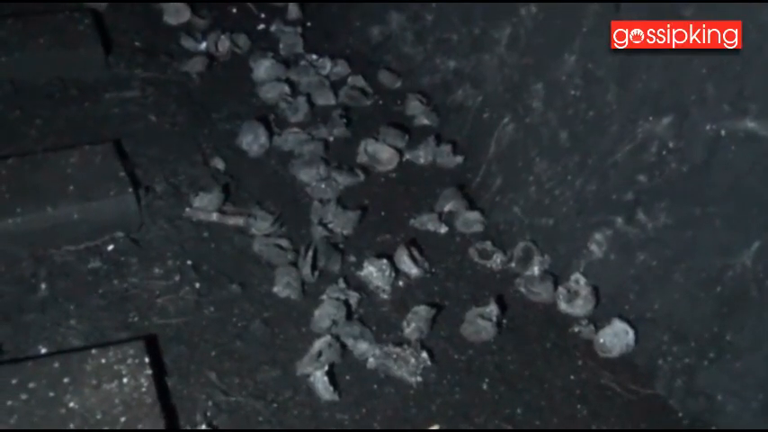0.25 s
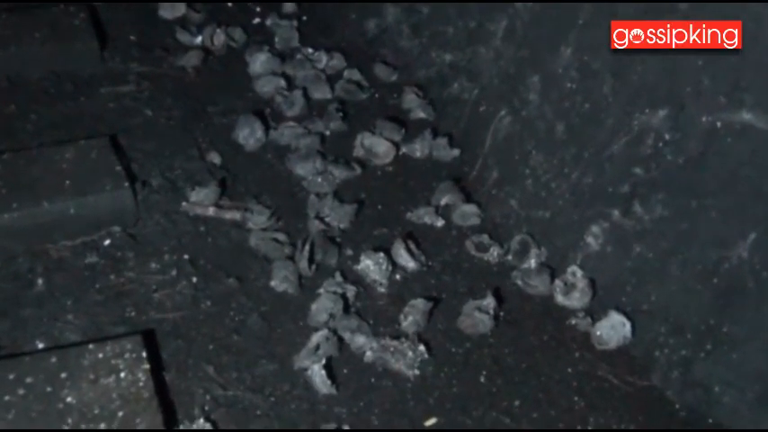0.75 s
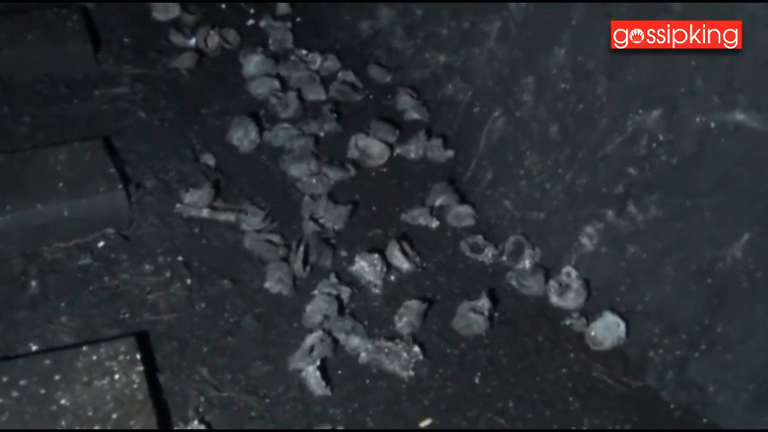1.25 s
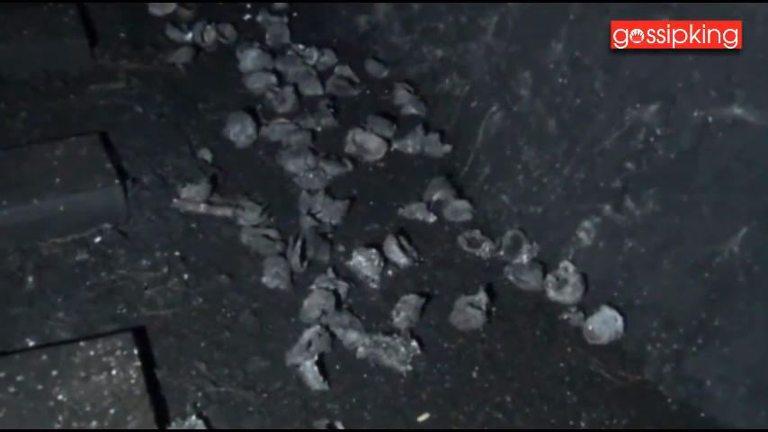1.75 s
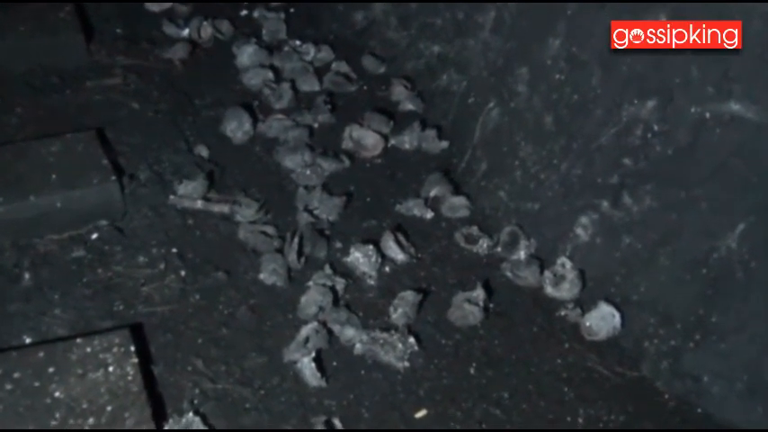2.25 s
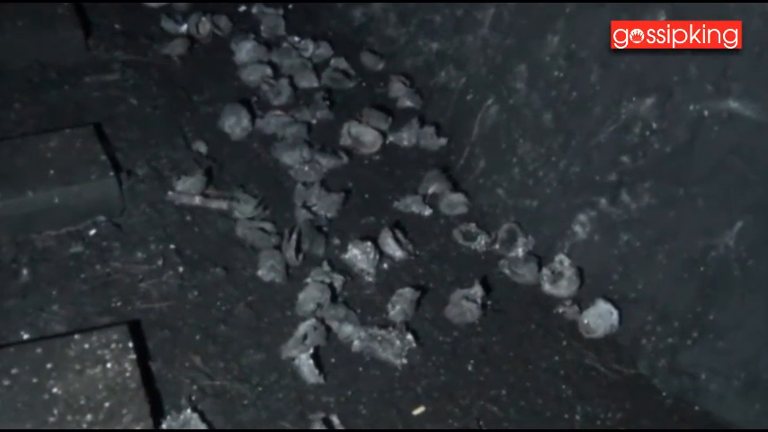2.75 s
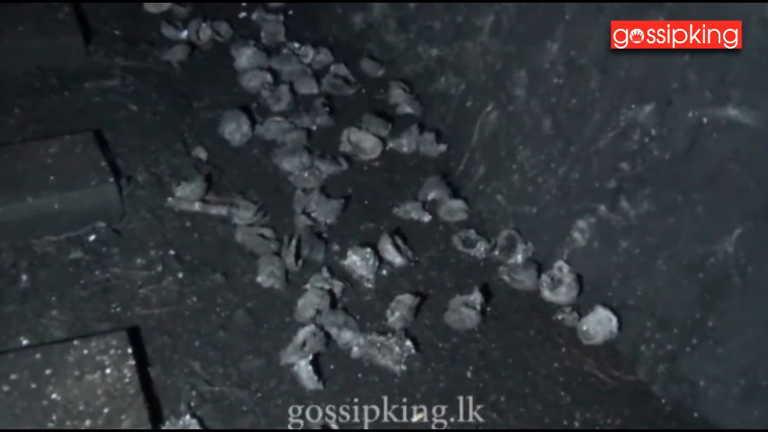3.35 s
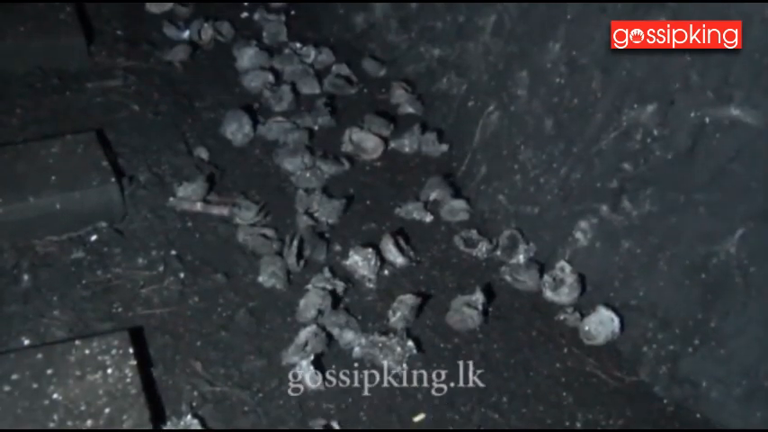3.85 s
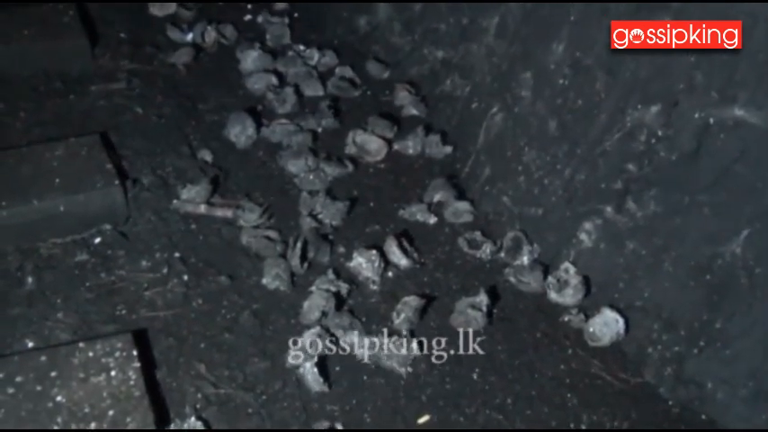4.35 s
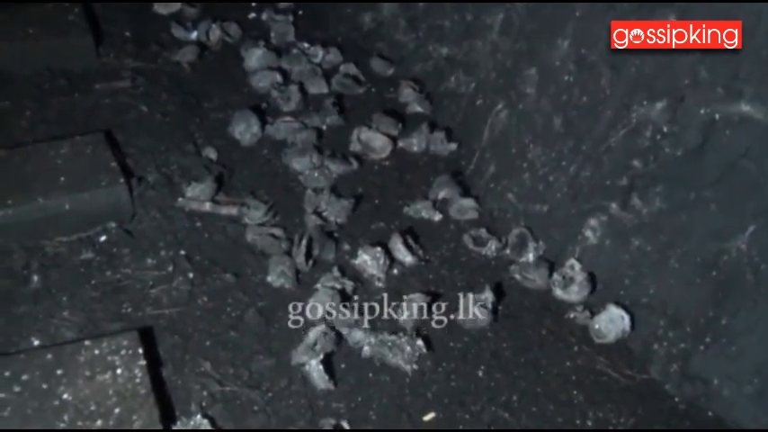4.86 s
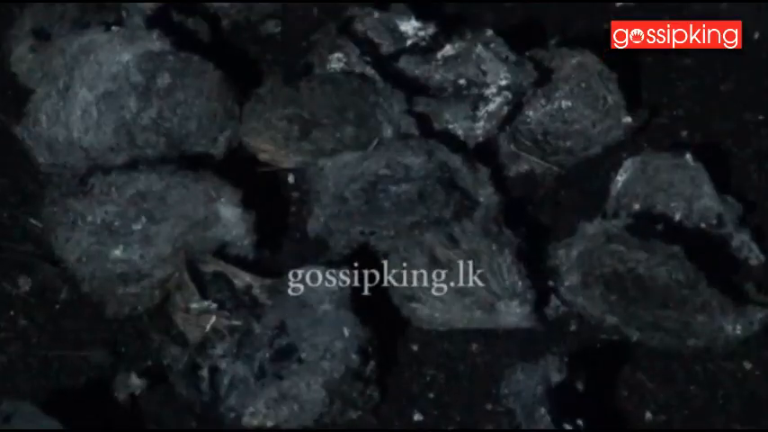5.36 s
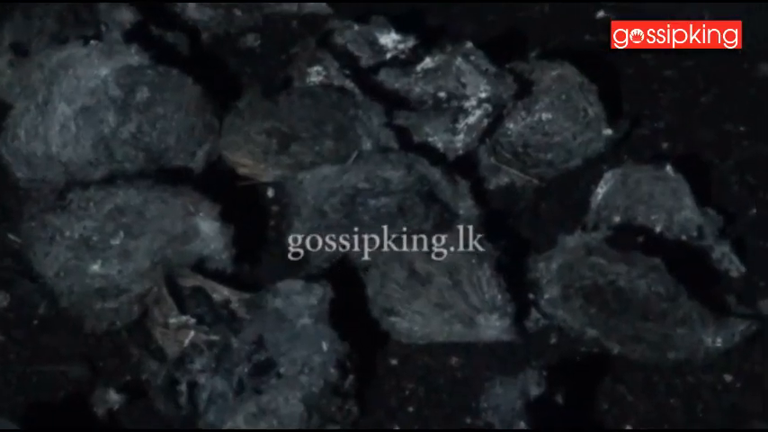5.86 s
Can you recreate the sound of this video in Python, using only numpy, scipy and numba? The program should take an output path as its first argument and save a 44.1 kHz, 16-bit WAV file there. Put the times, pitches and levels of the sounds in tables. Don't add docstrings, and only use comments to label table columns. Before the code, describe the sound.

Steady high insect chirring, dry ticks and hollow shell clacks near a handheld microphone, with five-a-second rough chirps later replaced by thin high zips.

```python
import sys
import numpy as np
from scipy import signal
from scipy.io import wavfile
from scipy.ndimage import uniform_filter1d
from numba import njit

SR = 44100
rng = np.random.default_rng(int(sys.argv[2]) if len(sys.argv) > 2 else 0)


def persist_wave(psi):
    counts = np.round(np.clip(psi, -1, 1) * 32767).astype(np.int16)
    wavfile.write(sys.argv[1], SR, np.atleast_2d(counts).T)


def nominal_scale(level):
    x = np.asarray(level, float) / 20
    return 10 ** x


N = 268789
T = np.arange(N) / SR

# time in seconds, level in dB.
CHORUS_LEVEL = [(0, -47.5), (.2, -49.5), (.29, -46.5), (.39, -51.5), (.45, -46), (.78, -50), (1.03, -45),
                (1.15, -52.5), (1.21, -46.5), (1.36, -47.5), (1.64, -46.5), (1.73, -53.5), (1.77, -43.5),
                (1.87, -52), (1.92, -48), (4.9, -47), (5.0, -49), (6.09, -48)]
# centre in Hz, width in Hz, level in dB,
# opposed left-right part in dB, share of the chorus swells it follows (0-1).
WING_RESONANCES = [(3525, 2400, 1.1, -12.5, 0.43), (4840, 3330, 2.34, -12.5, 1),
                   (6170, 1850, -0.42, -3.5, 0.84), (8540, 4700, -11.5, 0.5, 0)]
# start in seconds, rise in dB, fade time in seconds.
NEAR_RASPS = [(.405, 0, 0.081), (.613, 1, 0.032), (.968, 1.5, 0.084), (1.19, 3, 0.035), (1.404, 11, 0.015),
              (1.544, 9, 0.02), (1.615, 7.5, 0.023), (1.747, 0.5, 0.048), (1.885, 10.5, 0.02),
              (1.974, 3, 0.076), (2.05, 1.5, 0.034), (2.151, 6, 0.0071), (2.19, 4, 0.023), (2.469, 7, 0.04),
              (2.642, 3, 0.032), (2.842, 7, 0.0071), (2.875, 6.5, 0.012), (3.464, 6, 0.015),
              (5.733, 9.5, 0.013)]
CHORUS_MEAN_DB = -49
LEFT_DB = 4.5

# frequency in Hz, density in dB per Hz.
AIR_SPECTRUM = [(30, 0.5), (117, 1), (327, -2.5), (665, -8.5), (817, 0), (1120, -10), (1280, -6.5),
                (2600, -11)]
# time in seconds, level in dB.
AIR_LEVEL = [(0, -51), (1.3, -54), (1.97, -52.5), (2.4, -55.5), (3.81, -52), (4.29, -55.5), (4.87, -50),
             (5.09, -51), (6.09, -49)]
# frequency in Hz, left minus right in dB.
AIR_PAN = [(60, -4), (110, 2.5), (190, 0.5), (350, 5.5), (620, 1), (1120, -0.5), (2010, 1), (3610, 10)]

# start in seconds, peak in dB, frequency in Hz, left minus right in dB.
TICKS = [
    (0.158, -36.5, 9160, 13),
    (0.5087, -29, 8300, 1),
    (0.6125, -34, 5370, -4),
    (1.279, -26, 5700, -1),
    (1.4002, -29.5, 5370, 6),
    (1.5489, -40, 6500, -3),
    (2.4818, -31, 5000, -4),
    (2.5918, -39, 3600, -6),
    (4.0054, -36, 5980, 20),
    (4.6604, -36.5, 3300, 8),
]
# start in seconds, length in seconds, resonance in Hz, width in Hz,
# level in dB.
CRICKET_SWELLS = [
    (0.201, 0.17, 6580, 900, -47),
    (.41, 0.19, 7300, 590, -55),
    (1.173, .12, 7100, 900, -46),
    (2.502, .1, 6800, 500, -50),
    (2.83, .08, 6600, 597, -50),
]
# start in seconds, length in seconds, body resonance in Hz, level in dB.
SCUFFS = [(0.262, 0.054, 330, -47.5), (0.997, 0.078, 1200, -42.5), (1.252, 0.043, 995, -52),
          (1.91, 0.068, 262, -47.5), (2.36, 0.17, 1040, -49), (2.601, 0.027, 1130, -39.5),
          (3.926, 0.013, 246, -45), (4.007, 0.023, 422, -42), (4.668, 0.1, 920, -42.5),
          (4.714, 0.035, 199, -42), (4.792, 0.13, 55.4, -47.5), (4.852, .025, 650, -40),
          (5.49, 0.04, 1020, -41), (5.544, 0.01, 260, -37.5), (5.561, 0.051, 1270, -46),
          (5.66, 0.015, 200, -45.5), (5.699, 0.011, 450, -30.5), (6.015, 0.088, 200, -46.5),
          (6.018, 0.098, 640, -52)]

# start in seconds, peak in dB, ring in Hz, upper ring in dB re peak,
# left minus right in dB.
KNOCKS = [(.652, -30.5, 796, 4.5, 6), (1.102, -29, 797, 2.2, 2.5), (1.245, -14, 923, -10.5, -3.5),
          (2.483, -21, 1260, -10, -3), (2.569, -15, 897, -31, -4), (2.591, -25.5, 1144, 2, 6),
          (4.66, -29, 1210, 6, 5), (4.7161, -14, 1067, -2, 4), (4.863, -24.5, 973, -3, -8),
          (5.546, -13.5, 1020, 7, 5), (5.702, -24, 1050, 2, 3.5)]
# start in seconds, peak in dB, ring in Hz.
TAPS = [(.851, -41, 910), (.975, -35, 960), (1.009, -36.5, 1260), (1.135, -37, 1220), (1.279, -31.5, 1190),
        (2.381, -34, 1200), (2.474, -32.5, 950), (2.604, -45, 900), (3.829, -31, 1260), (3.894, -36, 970),
        (3.916, -36, 860), (4.008, -33, 1030), (4.019, -37, 1100), (4.099, -35, 920), (5.574, -35, 980)]
TAP_UPPER_DB, TAP_PAN_DB = 0, 5.5
RING_CYCLES = 20
SHELL_LOW_HZ = 373
CRACK_DB, CRACK_SHARE = -10, 0.7

# start in seconds, length in seconds, top pitch in Hz, level in dB.
NOTES = [(2.208, 0.16, 2250, -51), (2.376, 0.22, 2328, -46), (2.612, .114, 2310, -43.5),
         (2.781, .16, 2225, -46), (2.973, .17, 2340, -43), (3.173, .14, 2288, -42),
         (3.352, 0.19, 2493, -41.5), (3.555, .15, 2288, -42), (3.757, .13, 2636, -39),
         (3.944, .17, 2264, -43), (4.136, 0.17, 2297, -42), (4.326, 0.17, 2748, -39),
         (4.522, 0.16, 2625, -39), (4.727, .16, 2400, -40), (4.932, 0.066, 2430, -43)]
PARTIALS_DB = [-6.5, 0.5, -10, -18, -25.5]
NOTE_START_HZ = 2090
CLIMB_S, CLIMB_HZ_PER_S = .03, 40000

# start in seconds, peak in dB, wing resonance in Hz.
ZIPS = [
    (5.0014, -40.5, 9450),
    (5.154, -36.5, 9950),
    (5.2653, -41, 10150),
    (5.3523, -37.5, 10560),
    (5.497, -38, 9600),
    (5.625, -34, 9500),
    (5.7329, -39, 9380),
    (5.856, -36.5, 9500),
]

# frequency in Hz, share dropped (0-1).
DROPPED = [(700, .02), (1550, .2), (2200, .1), (2800, .02), (7000, .03), (8300, .2), (11100, .5),
           (11350, 1)]
# start in seconds, length in seconds.
MONO = [(-.1, .26), (.22, .104), (.434, .175), (.639, .03), (.988, .154), (1.292, .15), (1.502, .064),
        (2.015, .15), (2.434, .155), (2.953, .065), (3.118, .07), (3.238, .035), (3.457, .03),
        (3.717, .069), (3.881, .06), (4.22, .16), (4.445, .194), (4.824, .17), (5.428, .149), (5.677, .025),
        (5.897, .154)]
BASS_HZ, BASS_MARGIN_S = 1400, .074
# time in seconds, half width in seconds, dip in dB.
SPLICES = [
    (4.97, 0.011, 20.5),
    (6.005, 0.013, 9),
]


def unit(x):
    return x / np.sqrt(np.mean(x ** 2))


def noise():
    return rng.standard_normal(N)


@njit
def svf(x, hz, width):
    y, b, l = np.empty(len(x)), 0., 0.
    g, k = np.tan(np.pi * hz / SR), width / hz
    for i in range(len(x)):
        v = (b + g * (x[i] - l)) / (1 + g * (g + k))
        b, l, y[i] = 2 * v - b, l + 2 * g * v, k * v
    return y


def steep(x, hz, width):
    return svf(svf(x, 1. * hz, 1. * width), 1. * hz, 1. * width)


def walk(rate):
    k = max(int(SR / rate), 2)
    held = np.repeat(rng.standard_normal(N // k + 1), k)
    return unit(uniform_filter1d(uniform_filter1d(held, k), k)[:N])


def sides(pan_db):
    return nominal_scale(np.array([pan_db, -pan_db]) / 2)


def add(out, s, x, pan_db):
    i = int(s * SR)
    x = x[:N - i]
    out[:, i:i + len(x)] += np.outer(sides(pan_db), x)


def wide(make, side_db):
    return make() + nominal_scale(side_db) * make() * np.array([[1], [-1]])


def echoes(x, t60, wet_db, pan_db):
    t = np.arange(SR // 2) / SR
    tail = wide(lambda: rng.standard_normal(len(t)), side_db=-9)
    tail = tail * np.exp(-np.log(1000) * t / t60) * (t > .004)
    tail = tail / np.sqrt(np.sum(tail ** 2, axis=1, keepdims=True)) * sides(pan_db)[:, None]
    return x + nominal_scale(wet_db) * signal.fftconvolve(x.mean(axis=0)[None], tail, axes=1)[:, :N]


def chorus():
    swell_db = np.interp(T, *np.transpose(CHORUS_LEVEL)) - CHORUS_MEAN_DB
    rasp_db = sum(rise_db * (T > at) * np.exp(-np.maximum(T - at, 0) / fade)
                  for at, rise_db, fade in NEAR_RASPS)
    out = 0
    for hz, width, db, side_db, share in WING_RESONANCES:
        strikes = lambda: unit(steep(noise() * nominal_scale(2.37 * walk(900)), hz, width))
        level_db = db + share * swell_db + 1.24 * walk(25.18) + 0.58 * walk(6)
        out = out + nominal_scale(level_db) * wide(strikes, side_db)
    return out * nominal_scale(CHORUS_MEAN_DB + rasp_db - 2.5) * sides(LEFT_DB)[:, None]


def air():
    out, swell = 0, walk(3.52)
    spectrum_hz, spectrum_db = np.transpose(AIR_SPECTRUM)
    pan_hz, pans_db = np.transpose(AIR_PAN)
    for hz in 32 * 2 ** np.arange(0, 6.5, 1 / 3):
        db = np.interp(np.log(hz), np.log(spectrum_hz), spectrum_db) + 10 * np.log10(hz)
        pan_db = np.interp(np.log(hz), np.log(pan_hz), pans_db)
        band = wide(lambda: unit(steep(noise(), hz, hz * 0.32)), side_db=-8.0)
        out = out + nominal_scale(db + 0.77 * swell + 2.26 * walk(9)) * band * sides(pan_db + 2.5)[:, None]
    return unit(out) * nominal_scale(np.interp(T, *np.transpose(AIR_LEVEL)) + 2.0)


def ticks():
    out, t = np.zeros((2, N)), np.arange(SR // 50) / SR
    for at, db, hz, pan_db in TICKS:
        snap = np.sin(2 * np.pi * hz * t) * np.exp(-t / .0005)
        spit = .3 * rng.standard_normal(len(t)) * np.exp(-t / .001)
        add(out, at, nominal_scale(db + 6) * (snap + spit), pan_db)
    return out


def cricket():
    out = np.zeros((2, N))
    for at, length, hz, width, db in CRICKET_SWELLS:
        n = int(length * SR)
        clicks = unit(steep(rng.standard_normal(SR // 4), hz, width))[:n]
        add(out, at, nominal_scale(db) * clicks * np.hanning(n) ** 0.49, LEFT_DB)
    return out


def scuffs():
    out = np.zeros((2, N))
    for at, length, hz, db in SCUFFS:
        n = int(length * SR)
        grains = np.repeat(nominal_scale(3.8 * rng.standard_normal(SR // 400 + 1)), 100)[:SR // 4]
        grit = rng.standard_normal(SR // 4) * grains
        rub = unit(steep(grit, hz, hz * .9))[:n]
        add(out, at, nominal_scale(db) * rub * np.hanning(n) ** .3, 2.5)
    return out


def knocks():
    out, t = np.zeros((2, N)), np.arange(SR // 8) / SR
    for at, db, hz, upper_db, pan_db in KNOCKS + [(*tap, TAP_UPPER_DB, TAP_PAN_DB) for tap in TAPS]:
        fall = np.exp(-np.log(1000) * t * hz / RING_CYCLES)
        blow = 1 - np.exp(-(t / 0.0016) ** 2) + 0.62 * np.exp(-((t - .002) / 0.00094) ** 2)
        ring = np.sin(2 * np.pi * hz * t) + 0.45 * np.sin(2 * np.pi * 0.672 * hz * t)
        upper = np.sin(2 * np.pi * 1.47 * hz * t) * fall ** 3.8
        crack = unit(steep(rng.standard_normal(len(t)), 2100, 2000)) * t / .0008 * np.exp(1 - t / .0008)
        crack_db = upper_db + CRACK_DB - CRACK_SHARE * (db + 29.5)
        rattle = unit(svf(rng.standard_normal(len(t)), hz * 1.15, 630.0)) * fall ** 0.21
        sound = (ring * fall + nominal_scale(upper_db + 6.5) * upper) * blow
        sound = sound + nominal_scale(crack_db) * crack + 0.084 * rattle
        add(out, at - .0005, nominal_scale(db + 2.0) * sound, pan_db)
    out = signal.sosfilt(signal.butter(3, SHELL_LOW_HZ, "highpass", fs=SR, output="sos"), out)
    return echoes(out, t60=0.12, wet_db=-13.5, pan_db=5.5)


def singer():
    out = np.zeros((2, N))
    wobble, throb, spray = .02 * walk(450), walk(1000) * nominal_scale(2 * walk(60)), walk(4000)
    for at, length, top_hz, db in NOTES:
        t = np.arange(int(length * SR)) / SR
        now = np.arange(len(t)) + int(at * SR)
        effort = np.sin(np.pi * (t / length) ** 0.54) ** 0.72
        climb_hz = top_hz - NOTE_START_HZ
        climb_s = CLIMB_S + climb_hz / CLIMB_HZ_PER_S
        hz = top_hz - climb_hz * np.exp(-(t / climb_s) ** 1.474)
        hz = hz * (1 + wobble[now] * effort - 0.0401 * (t / length) ** 2)
        phase = 2 * np.pi * np.cumsum(hz) / SR
        hoarse = np.clip(.45 + climb_hz / 1200, 0, .9) * effort
        tone = 0
        for k, partial_db in enumerate(PARTIALS_DB):
            rough = hoarse * min(.75 + .25 * k, 1)
            flutter = (throb if k < 2 else spray)[now]
            strength = np.sqrt(1 - rough) + np.sqrt(rough) * flutter
            tone = tone + nominal_scale(partial_db) * strength * np.sin((k + 1) * phase)
        add(out, at, nominal_scale(db) * effort * tone, 2.5)
    return echoes(out, t60=0.55, wet_db=0.5, pan_db=2.0) * (T < SPLICES[0][0])


def katydid():
    out, t = np.zeros((2, N)), np.arange(SR // 8) / SR
    for at, db, hz in ZIPS:
        buzz = unit(steep(rng.standard_normal(len(t)), hz, 1500))
        add(out, at, nominal_scale(db - 15) * buzz * np.exp(-t / 0.058), 5.5)
    return out


def scene():
    return chorus() + air() + ticks() + cricket() + scuffs() + knocks() + singer() + katydid()


def during(spans, t, margin):
    return sum((t >= s + margin) & (t <= s + length - margin) for s, length in spans) > 0


def camera_losses(x):
    mid_side = np.array([x[0] + x[1], x[0] - x[1]]) / 2
    hz, t, (mid, side) = signal.stft(mid_side, SR, nperseg=1024, noverlap=768)
    power = np.abs(mid) ** 2
    streak = uniform_filter1d(uniform_filter1d(power, size=3, axis=0), size=13, axis=1)
    weakness = streak / uniform_filter1d(streak, size=13, axis=0) ** .7
    rank = np.argsort(np.argsort(weakness, axis=1), axis=1) / len(t)
    click = uniform_filter1d(power, size=25, axis=0) > 2.2 * uniform_filter1d(streak, size=25, axis=0)
    strong = rank > np.interp(hz, *np.transpose(DROPPED))[:, None]
    keep = strong | (click & (hz[:, None] < 11600))
    late = t + np.repeat(.012 * rng.standard_normal(len(hz) // 8 + 1), 8)[:len(hz), None]
    margin = BASS_MARGIN_S * np.sqrt(np.clip(1 - hz / BASS_HZ, 0, 1))[:, None]
    stereo = ~during(MONO, late, margin)
    keep_side = keep * (stereo | (click & (hz[:, None] < BASS_HZ * 2)))
    kept = np.array([mid * keep, side * keep_side])
    mid, side = signal.istft(kept, SR, nperseg=1024, noverlap=768)[1][:, :N]
    return np.array([mid + side, mid - side])


def roll_off(x):
    return signal.sosfilt(signal.butter(12, 12230, fs=SR, output="sos"), x)


def record(dry):
    dip_db = sum(db * np.clip(1.5 - np.abs(T - s) / half, 0, 1) for s, half, db in SPLICES)
    mix = camera_losses(dry) * nominal_scale(-dip_db)
    return roll_off(mix)


dry = scene()
out = record(dry)
persist_wave(out)
```